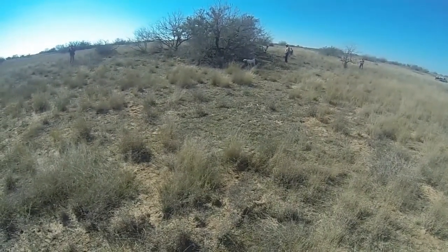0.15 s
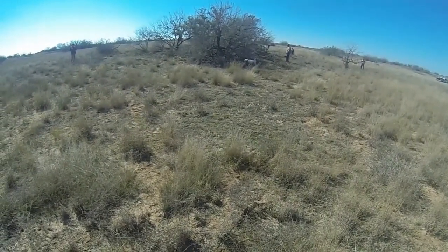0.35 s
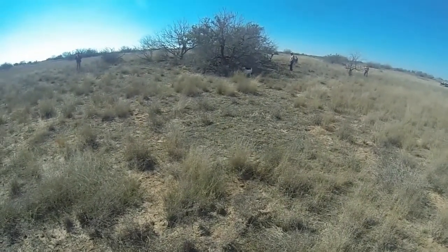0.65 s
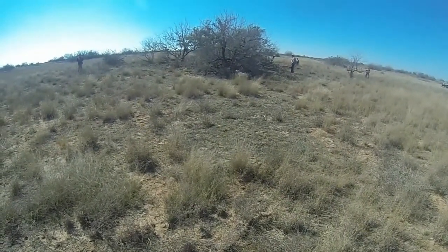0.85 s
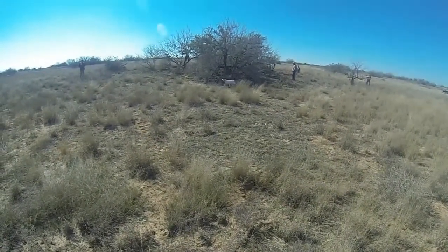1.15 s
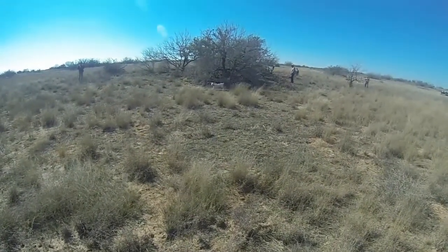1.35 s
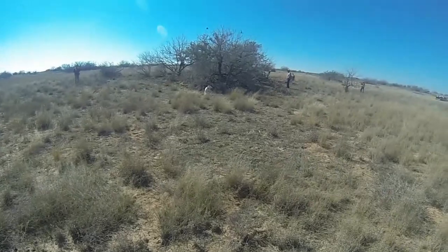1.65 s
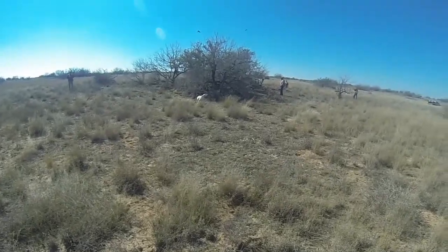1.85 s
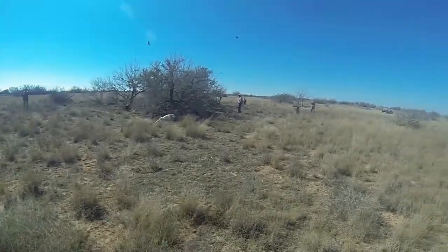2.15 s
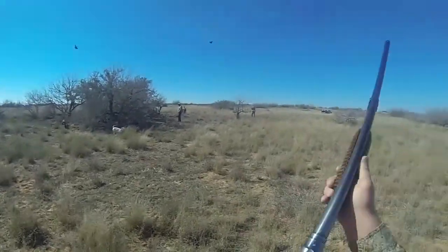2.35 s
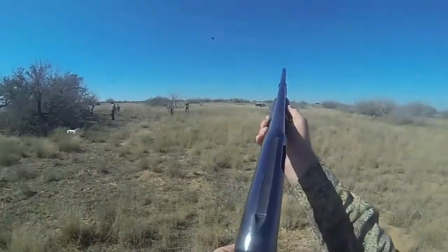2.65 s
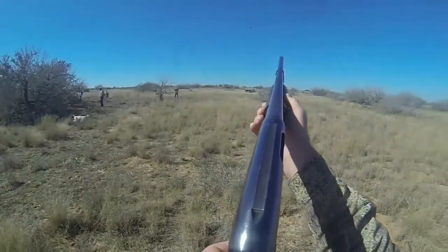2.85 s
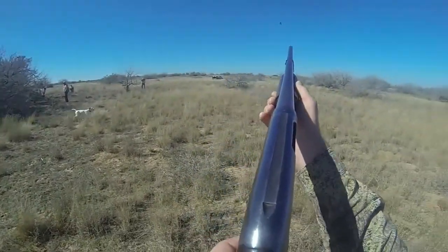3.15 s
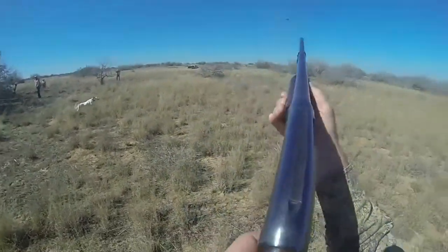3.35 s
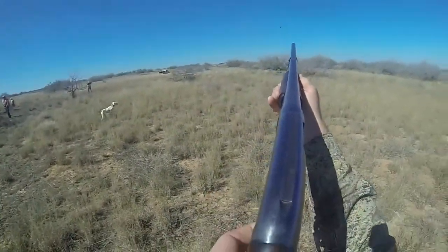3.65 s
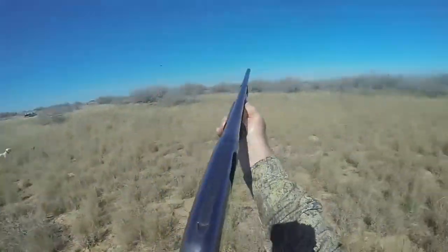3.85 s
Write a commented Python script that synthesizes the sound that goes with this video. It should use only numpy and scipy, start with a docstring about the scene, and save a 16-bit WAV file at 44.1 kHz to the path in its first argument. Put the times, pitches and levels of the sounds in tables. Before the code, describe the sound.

A single shotgun blast close to the microphone, followed at once by a metallic clack, after windy rumble and bird chips

```python
"""Wind rumbles and buffets on the microphone of a camera worn by a bird hunter in dry grass.
Flushed birds give sharp falling chips (gliding tones with overtones); grass and sleeves rustle (noise grains)
as the shotgun comes up. The shot (pressure pulses, gas noise) overloads the microphone and rolls over the field.
A fifth of a second later comes a more metallic bang, likely the action slamming shut. Hiss and a whine lie below."""
import sys
import numpy as np
from scipy import signal
from scipy.fft import rfft, irfft
from scipy.io import wavfile
from scipy.ndimage import uniform_filter1d

SR = 44100
rng = np.random.default_rng(int(sys.argv[2]) if len(sys.argv) > 2 else 0)


def master(y):
    """Save y as 16-bit WAV."""
    cut = np.clip(np.atleast_2d(y).T, -1, 1)
    pcm = np.round(cut * 32767)  # scale
    wavfile.write(sys.argv[1], SR, pcm.astype(np.int16))


N = 176400
T = np.arange(N) / SR


def from_db(db):
    """Decibels to amplitude gain."""
    return 10 ** (np.asarray(db) / 20)


def rms_one(x):
    """Scale to unit power."""
    return x / np.sqrt(np.mean(x ** 2) + 1e-20)


def in_time(rows):
    """Each column of a time curve, joined by straight lines."""
    s, *columns = np.transpose(rows)
    return [np.interp(T, s, column) for column in columns]


def colour(x, spectrum):
    """Minimum-phase filter of unit power gain that follows a spectrum, built by folding the cepstrum."""
    hz, db = np.transpose(spectrum)
    size = 8192
    grid_hz = np.maximum(np.fft.rfftfreq(size, 1 / SR), 1)
    gain = from_db(np.interp(np.log(grid_hz), np.log(hz), db))
    cepstrum = irfft(np.log(gain))
    cepstrum[1:size // 2] *= 2
    cepstrum[size // 2 + 1:] = 0
    impulse = irfft(np.exp(rfft(cepstrum)))
    return signal.fftconvolve(x, impulse / np.linalg.norm(impulse))[:len(x)]


def noise(spectrum):
    """Steady coloured noise of unit power; the first second, filter run-in, is dropped."""
    return rms_one(colour(rng.standard_normal(N + SR), spectrum)[SR:])


def drift(rate_hz):
    """Slow random wander of spread 1: two-pole filtered noise, one value per 40 samples."""
    r = np.exp(-80 * np.pi * rate_hz / SR)
    white = rng.standard_normal(N // 40 + 2002)
    slow = signal.lfilter([1], [1, -2 * r, r * r], white)[2000:]
    return np.interp(np.arange(N) / 40, np.arange(len(slow)), rms_one(slow))


def evened(x, window_s):
    """Noise with its chance swells divided out."""
    power = uniform_filter1d(x ** 2, max(int(window_s * SR), 2))
    return x / np.sqrt(np.abs(power) + 1e-12)


def dull(x, hz):
    """First-order low-pass."""
    return signal.lfilter(*signal.butter(1, min(hz, .45 * SR), fs=SR), x)


def add(out, s, x):
    """Mix a sound in at a time."""
    i = int(np.clip(s * SR, 0, N))
    out[i:i + len(x)] += x[:N - i]


def burst(hold_s, t60_s, edge_hz):
    """Noise that starts at once, holds, then decays exponentially."""
    t = T[:SR // 5]
    grain = evened(rng.standard_normal(len(t)), 0.00046)
    return dull(grain * from_db(-60 * np.maximum(t - hold_s, 0) / t60_s), edge_hz)


def pressure_pulse(length_s):
    """One N-shaped wave, its corners rounded by two low-passes."""
    u = T[:SR // 50] / length_s
    return dull(dull((2 * u - 1) * (u < 1), 3400), 3400)


GRAIN_SPREAD_DB, GRAIN_SHARE = 2.6, .75   # mean of the exponential spread; power share of grains


def crackle(spectrum, grains_per_s):
    """Tiny random snaps over smooth noise of the same colour."""
    sizes = from_db(GRAIN_SPREAD_DB * np.minimum(rng.exponential(1, N), 5))
    signed = sizes * rng.choice([-1, 1], N)
    hits = rng.random(N) < grains_per_s / SR
    grains = rms_one(colour(signed * hits, spectrum))
    return np.sqrt(GRAIN_SHARE) * grains + np.sqrt(1 - GRAIN_SHARE) * noise(spectrum)


# muzzle blast and near reflections: t/s, noise level/dB, hold/s, T60/s, upper edge f/Hz, pulse level/dB, pulse length/s
BLASTS = [(3.2094, -8, 0.0022, 0.027, 14070, -15, 0.00025), (3.2123, -15, 0.00068, 0.0043, 3010, -8, .0011),
          (3.2139, -1.5, 0.0026, 0.015, 14900, -8.5, 0.004), (3.2246, -20.5, .002, 0.02, 5000, -3, 0.00094),
          (3.2321, -13, 0.00061, 0.011, 2214, -0.5, .0012)]
# gas noise colour: f/Hz, level/dB
GAS_COLOUR = [(35, -42.5), (60, -5), (140, 2), (248, -11.5), (350, -4), (460, -16), (580, -2), (660, -12),
              (740, -5), (931, -6), (1170, 4), (1400, -14.5), (1640, -4), (1820, 2), (2010, -13.5),
              (2220, -2), (2560, -15.5), (2780, -9), (3120, -10.5), (3760, -6), (4500, -15), (5000, -11.5),
              (5840, -10), (6900, -25), (8700, -16.5), (9900, -22.5), (11700, -30), (14100, -26.5),
              (15500, -43.5)]
# short tail colour: f/Hz, level/dB
NEAR_COLOUR = [(88, -31.5), (150, -6.5), (661, 2), (1540, -22), (2600, -21), (3890, -16.5), (15000, -38)]
# long tail colour: f/Hz, level/dB
FAR_COLOUR = [(150, -8), (350, -1), (600, -11), (950, -4), (1400, -15), (2000, -8), (2900, -20),
              (7000, -37.5), (15000, -52)]
NEAR_TAIL_DB, NEAR_TAIL_T60_S = -30, 0.38
FAR_TAIL_DB, FAR_TAIL_T60_S = -33.5, 1.43
ECHOES_PER_S = 420


def echo_tail(age_s, level_db, t60_s, spectrum):
    """Many small echoes from the brush, decaying exponentially with a wandering level."""
    decay_db = level_db - 60 * np.maximum(age_s, 0) / t60_s
    return from_db(decay_db + 2.2 * drift(40)) * crackle(spectrum, ECHOES_PER_S)


def shot():
    """Pressure pulses with turbulent gas noise, then a short and a long tail rolling over the field."""
    gas, pulses = np.zeros(N), np.zeros(N)
    for s, db, hold_s, t60_s, edge_hz, pulse_db, length_s in BLASTS:
        add(gas, s, from_db(db) * burst(hold_s, t60_s, edge_hz))
        add(pulses, s, from_db(pulse_db) * pressure_pulse(length_s))
    age_s = T - BLASTS[2][0]
    near = echo_tail(age_s, NEAR_TAIL_DB, NEAR_TAIL_T60_S, NEAR_COLOUR)
    far = echo_tail(age_s, FAR_TAIL_DB, FAR_TAIL_T60_S, FAR_COLOUR)
    return colour(gas, GAS_COLOUR) + pulses + (near + far) * (age_s > 0)


# metal contacts of the gun: t/s, level/dB, T60/s
CONTACTS = [(3.2015, -19, 0.017), (3.2963, -29, 0.022), (3.3443, -23.5, .027), (3.357, -30, 0.03),
            (3.366, -23.5, 0.04), (3.3752, -26, 0.021), (3.3925, -25.5, 0.041), (3.4002, -20, .015),
            (3.4011, -5, 0.018), (3.408, -11.5, .03), (3.4111, -34, 0.024), (3.4188, -26.5, .022),
            (3.4241, -24, 0.028), (3.431, -31, 0.058), (3.455, -38, 0.039), (3.5011, -39.5, 0.046),
            (3.9206, -35, 0.0095), (3.9413, -34.5, 0.0039)]
# metal colour: f/Hz, level/dB
METAL = [(88, -36), (220, -16), (500, -23), (877, -12.5), (1200, -8.5), (1540, -21.5), (1800, -6.5),
         (2500, -16.5), (3450, -9.5), (4300, -23), (4840, -19), (7000, -31), (8660, -27.5), (10500, -35),
         (14600, -30.5), (15500, -46.5)]
# bolt slams home and bounces: t/s, level/dB
SLAMS = [(3.4089, -7.5), (3.4175, -12)]
CONTACT_HOLD_S, CONTACT_EDGE_HZ = 0.00065, 7700
SLIDE_DB, SLIDE_GRAINS_PER_S = -46, 200
SLAM_LENGTH_S = .0007
STOCK_HZ, STOCK_T60_S, STOCK_DB = 1100, 0.025, -8.5


def action():
    """The gun's steel parts click, the bolt scrapes, then slams with a thump that rings the stock."""
    hits, thumps = np.zeros(N), np.zeros(N)
    for s, db, t60_s in CONTACTS:
        add(hits, s, from_db(db) * burst(CONTACT_HOLD_S, t60_s, CONTACT_EDGE_HZ))
    sliding = (T > BLASTS[-1][0]) & (T < SLAMS[0][0])
    slide = from_db(SLIDE_DB) * crackle(METAL, SLIDE_GRAINS_PER_S) * sliding
    push = pressure_pulse(SLAM_LENGTH_S)
    t = T[:len(push)]
    stock = from_db(STOCK_DB - 60 * t / STOCK_T60_S) * np.sin(2 * np.pi * STOCK_HZ * t)
    for s, db in SLAMS:
        add(thumps, s, from_db(db) * (push - stock))
    return colour(hits, METAL) + slide + thumps


# bird chips: t/s, level/dB
CHIPS = [(.314, -53), (0.668, -55), (0.758, -47), (.88, -47), (0.972, -51), (1.127, -45.5), (1.205, -49),
         (1.456, -42), (1.56, -49), (1.702, -40.5), (1.793, -49.5), (1.94, -39.5), (2.033, -49),
         (2.183, -39.5), (2.279, -44), (2.411, -38.5), (2.569, -35.5), (2.757, -36.5), (2.909, -36.5),
         (3.132, -31)]
# shape of every chip, an arch and a plunge: t from reference point/s, f/Hz, level/dB
CHIP = [(-.027, 2710, -39.5), (-.018, 3967, -28), (-.012, 4210, -23), (-.006, 3640, -20),
        (-.003, 2656, -4.5), (0, 2250, -1.5), (.003, 2000, 1), (.006, 1397, -11), (0.011, 948, -13)]
# how the chips change over time: t/s, opening arch level/dB, length factor/1
ARCH = [(.6, 4.5, 1.5), (1, -16, 1.05), (2.2, -7.5, 1), (2.45, 3, 1.1)]
OVERTONE_DB, CHIP_RASP_DB = -18.5, -17
CHIP_JITTER, CHIP_FLUTTER_DB = .04, 2.5   # rms: fraction of pitch, level


def chips():
    """Rough plunging tones with two overtones; pitch and level jitter, noise rasps the fundamental."""
    out = np.zeros(N)
    when, hz, shape = np.transpose(CHIP)
    arch, length_factor = in_time(ARCH)
    for s, level_db in CHIPS:
        i = int(s * SR)
        stretch = length_factor[i]
        t = np.arange(when[0], when[-1], 1 / (SR * stretch))
        pitch_hz, shape_db = np.interp(t, when, hz), np.interp(t, when, shape)
        jitter = 1 + CHIP_JITTER * drift(250)[:len(t)]
        phase = 2 * np.pi * np.cumsum(pitch_hz * jitter) / SR
        overtones = np.sin(2 * phase) + 0.34 * np.sin(3 * phase)
        roughness = rms_one(dull(dull(rng.standard_normal(len(t)), 1500), 1500))
        rasp = from_db(CHIP_RASP_DB) * roughness * np.sin(phase)
        tone = np.sin(phase) + from_db(OVERTONE_DB + shape_db / 2) * overtones + rasp
        arch_db = arch[i] * np.interp(t, when[3:5], [1, 0])   # full in the arch, faded out by the fifth point
        flutter_db = CHIP_FLUTTER_DB * drift(200)[:len(t)]
        add(out, s + when[0] * stretch, from_db(level_db + shape_db + arch_db + flutter_db) * tone)
    return out


# softer peeps: start t/s, length/s, start f/Hz, middle f/Hz, end f/Hz, level/dB
PEEPS = [(0.376, 0.035, 4170, 4110, 3700, -67.5), (0.46, 0.036, 3990, 4010, 3870, -66.5),
         (0.892, 0.036, 1960, 2025, 1850, -52), (0.931, 0.045, 1943, 2053, 2000, -54.5),
         (0.982, 0.075, 2070, 1916, 1747, -56), (1.474, .028, 1792, 1678, 1630, -56),
         (1.491, 0.055, 1830, 1724, 1850, -51), (2.351, 0.027, 2260, 2292, 2544, -51),
         (2.86, 0.012, 1828, 2132, 2400, -48.5), (3.517, 0.013, 2060, 2003, 2060, -44.5),
         (3.721, 0.014, 3740, 2790, 2880, -51), (3.794, 0.017, 3400, 2600, 3650, -54.5),
         (3.95, .02, 3270, 2350, 2280, -48)]
PEEP_WAVER_HZ, PEEP_FLUTTER_DB = 50, 4   # rms


def peeps():
    """Soft sine tones on a parabolic pitch glide, wavering in pitch and level."""
    out = np.zeros(N)
    for s, length_s, start_hz, middle_hz, end_hz, level_db in PEEPS:
        u = np.linspace(0, 1, int(length_s * SR))
        glide_hz = np.polyval(np.polyfit([0, .5, 1], [start_hz, middle_hz, end_hz], 2), u)
        pitch_hz = glide_hz + PEEP_WAVER_HZ * drift(90)[:len(u)]
        flutter_db = PEEP_FLUTTER_DB * drift(73)[:len(u)]
        envelope = from_db(level_db + flutter_db) * np.abs(np.sin(np.pi * u)) ** .5
        add(out, s, envelope * np.sin(2 * np.pi * np.cumsum(pitch_hz) / SR))
    return out


# colour of the scattered calls: f/Hz, level/dB
SCATTER = [(1200, -21.5), (2150, 4), (3200, -15)]
SCATTER_DB, SCATTER_T60_S = -9.5, 0.15   # level relative to the direct calls
BIRD_ECHO_S, BIRD_ECHO_DB = .007, -7


def birds():
    """Chips and peeps with one delayed ground echo and a decaying-noise scatter from the brush."""
    calls = chips() + peeps()
    brush = colour(burst(0, SCATTER_T60_S, 5000), SCATTER)
    scattered = rms_one(signal.fftconvolve(calls, brush)[:N]) * calls.std()
    ground = np.interp(T - BIRD_ECHO_S, T, calls)
    return calls + from_db(BIRD_ECHO_DB) * ground + from_db(SCATTER_DB) * scattered


# soft hollow flaps, perhaps wingbeats: t/s, level/dB
FLAPS = [(.329, -42), (.348, -40), (.394, -42.5), (0.439, -37), (0.484, -51), (0.527, -40), (0.844, -37),
         (.883, -38), (.941, -30.5), (1.042, -33.5), (1.312, -35), (1.452, -34), (1.568, -39),
         (1.616, -34.5), (1.981, -38)]
# flap colour: f/Hz, level/dB
FLAP_COLOUR = [(300, -29), (650, 2.5), (830, 7), (1100, -9), (1500, -16.5), (5000, -40)]
FLAP_HOLD_S, FLAP_T60_S = 0.00055, .024


def flaps():
    """Short noise puffs of air with a hollow colour."""
    out = np.zeros(N)
    for s, db in FLAPS:
        add(out, s, from_db(db) * burst(FLAP_HOLD_S, FLAP_T60_S, 11000))
    return colour(out, FLAP_COLOUR)


# knocks of gear against the camera: t/s, peak level/dB, upper edge f/Hz
KNOCKS = [(2.467, -21, 4000), (2.6872, -26, 1800), (2.993, -39, 6000), (3.091, -33, 4000),
          (3.9732, -22.5, 2500)]
# camera housing modes: f/Hz, level/dB, T60/s
HOUSING = [(370, 1, 0.019), (668, 10, 0.021), (830, 6, 0.0078), (1190, 7, .02), (1800, 16, 0.015),
           (2760, 1.5, 0.021), (4900, -5, 0.037), (8570, 1, 0.0094)]
KNOCK_T60_S = .016


def knocks():
    """Short rough contacts that ring the camera housing, a bank of two-pole resonators."""
    out = np.zeros(N)
    for s, db, edge_hz in KNOCKS:
        contact, sound = burst(0, KNOCK_T60_S, edge_hz), 0
        for hz, mode_db, t60_s in HOUSING:
            r, w = from_db(-60 / (t60_s * SR)), 2 * np.pi * hz / SR
            mode = signal.lfilter([1, 0, -1], [1, -2 * r * np.cos(w), r * r], contact + 1e-18)
            sound = sound + from_db(mode_db) * mode
        add(out, s, from_db(db) * sound / np.abs(sound).max())
    return out


# snaps of dry stalks and cloth, plus one light knock of gear at 2.582 s: t/s, level/dB
SNAPS = [(.2278, -43.5), (.242, -48), (0.2738, -47), (0.2829, -38), (0.4807, -48), (.331, -53),
         (0.3787, -52), (1.125, -43), (1.455, -55), (2.178, -40), (2.349, -42), (2.582, -44), (2.947, -45)]
# snap colour: f/Hz, level/dB
SNAP_COLOUR = [(300, -3), (800, 8.5), (2000, 1.5), (4200, -12.5), (7000, -17.5), (10500, -18.5),
               (14000, -24)]
SNAP_HOLD_S, SNAP_T60_S = .001, .02


def snaps():
    """Single dry cracks: coloured noise bursts."""
    out = np.zeros(N)
    for s, db in SNAPS:
        add(out, s, from_db(db) * burst(SNAP_HOLD_S, SNAP_T60_S, 15000))
    return colour(out, SNAP_COLOUR)


# rustle of grass and clothing: t/s, level/dB
RUSTLING = [(0, -66.5), (.21, -69), (.24, -55.5), (.36, -58), (.7, -57), (.9, -55), (2.1, -55.5),
            (2.25, -52.5), (2.55, -51), (2.8, -54), (3.18, -52), (3.5, -64), (4, -56.5)]
# rustle colour: f/Hz, level/dB
RUSTLE_COLOUR = [(200, -5), (500, 7), (900, 9), (1400, 2.5), (2000, 5), (2600, -3.5), (3500, -34),
                 (5200, -26), (7000, -32.5), (8700, -26), (11000, -22.5), (15000, -33)]
# crisp swish of the sleeves: t/s, level/dB
SWISHING = [(0, -70.5), (.21, -68.5), (.36, -67), (2.14, -67), (2.19, -60.5), (2.4, -58), (2.6, -59.5),
            (2.8, -63.5), (3.18, -62.5), (3.5, -70), (4, -63.5)]
# swish colour: f/Hz, level/dB
SWISH_COLOUR = [(1500, -4), (3000, 9.5), (5300, 0), (7000, -7), (8700, -2.5), (11000, -15.5), (15000, -11)]
RUSTLE_GRAINS_PER_S = 230


def rustle():
    """Crackling grass and cloth, and a smoother sleeve swish, strongest while the gun is raised."""
    grass_db = in_time(RUSTLING)[0] + 2 * drift(14)
    grass = from_db(grass_db) * crackle(RUSTLE_COLOUR, RUSTLE_GRAINS_PER_S)
    swish_db = in_time(SWISHING)[0] + 2 * drift(40)
    return grass + from_db(swish_db) * noise(SWISH_COLOUR)


# gusts on the microphone, much fainter after the shot: t/s, rumble level/dB, buffeting level/dB
WIND = [(0, -27, -49), (.12, -17, -35), (.3, -18.5, -35), (.38, -27.5, -51), (.46, -19.5, -36),
        (.63, -23.5, -40.5), (.76, -18, -31.5), (.93, -15.5, -20.5), (1.06, -18, -28), (1.16, -9.5, -27.5),
        (1.25, -27, -28), (1.37, -12.5, -29.5), (1.6, -21, -33), (1.7, -16.5, -27.5), (1.77, -13.5, -23),
        (2.06, -13.5, -15.5), (2.11, -18.5, -34), (2.25, -20, -25), (2.45, -20, -38), (2.6, -22.5, -39.5),
        (2.7, -32.5, -50.5), (2.8, -27, -49.5), (2.87, -19, -30), (3.19, -18.5, -35), (3.225, -21, -53),
        (3.26, -37.5, -53.5), (3.56, -42.5, -53.5), (3.66, -32, -45.5), (3.82, -35.5, -50.5),
        (4, -36.5, -38)]
# rumble colour: f/Hz, level/dB
RUMBLE = [(10, -12.5), (22, 3), (40, -1.5), (70, -3), (110, -10), (150, -14), (250, -31.5), (500, -100)]
# buffeting colour: f/Hz, level/dB
BUFFET = [(60, -23), (110, 0), (160, -1), (210, -4.5), (300, -12), (450, -20), (700, -30), (1000, -36.5),
          (1500, -63), (4000, -105)]
LUMP_DB = 1.5   # rms on the buffeting; half as much on the rumble


def wind():
    """Deep rumble, with lumpy buffeting above it in the gusts."""
    rumble_db, buffet_db = in_time(WIND)
    lumps_db = LUMP_DB * drift(55)
    rumble = from_db(rumble_db + lumps_db / 2) * evened(noise(RUMBLE), 0.11)
    buffeting = from_db(buffet_db + lumps_db) * evened(noise(BUFFET), 0.059)
    return rumble + buffeting


# steady hiss colour: f/Hz, level/dB
HISS = [(1500, -11.5), (2500, 6), (4000, -14), (6500, -5), (9000, -4), (12000, -12.5), (15000, -8)]
HISS_DB = -71.5
WHINE_HZ, WHINE_DB, WHINE_WAVER_HZ = 7420, -74, 130
BLIP_HZ, BLIP_EVERY_S, BLIP_LENGTH_S, FIRST_BLIP_S = 420, .1252, .009, .058   # blip: upward pitch step
DIP_DB, DIP_RECOVERY_DB_PER_S = 22, 19.5


def camera_noise():
    """Hiss and a wavering electronic whine blipping up 8 times/s; both drop at the shot and creep back."""
    blip = (T - FIRST_BLIP_S) % BLIP_EVERY_S < BLIP_LENGTH_S
    pitch_hz = WHINE_HZ + BLIP_HZ * blip + WHINE_WAVER_HZ * drift(110)
    whine = from_db(WHINE_DB) * np.sin(2 * np.pi * np.cumsum(pitch_hz) / SR)
    age_s = T - BLASTS[0][0]
    dip_db = np.maximum(DIP_DB - DIP_RECOVERY_DB_PER_S * age_s, 0) * (age_s > 0)
    return from_db(-dip_db) * (whine + from_db(HISS_DB) * noise(HISS))


def scene():
    """Sum of all sources at one microphone."""
    gun = shot() + action()
    handling = knocks() + snaps() + rustle()
    return (gun + birds() + flaps() + handling + wind() + camera_noise())[None]


OVERLOAD, CUTOFF_HZ = 1, 15800   # amplitude ceiling; low-pass edge


def record(dry):
    """Soft clipping overloads the microphone on loud peaks; a steep low-pass cuts the top."""
    clipped = dry / (1 + (dry / OVERLOAD) ** 4) ** (1 / 4)
    low_pass = signal.ellip(10, .1, 80, CUTOFF_HZ, fs=SR, output="sos")
    return signal.sosfilt(low_pass, clipped)


dry = scene()
out = record(dry)
master(out)
```